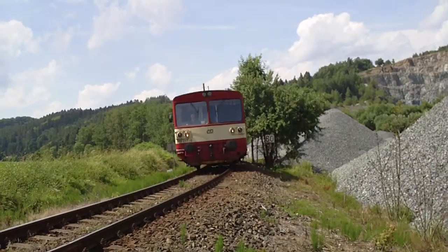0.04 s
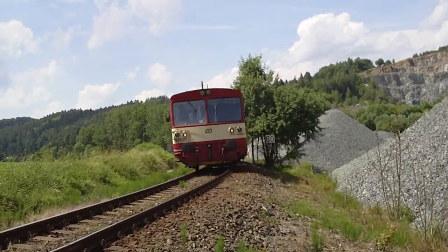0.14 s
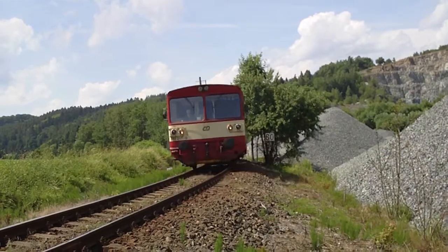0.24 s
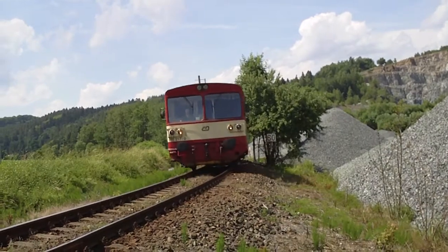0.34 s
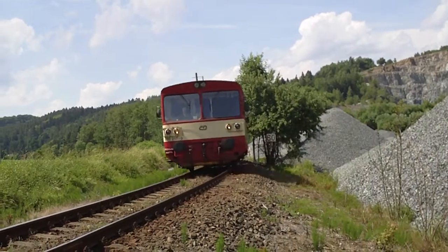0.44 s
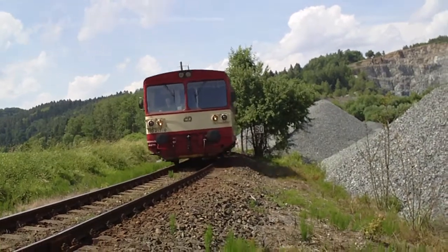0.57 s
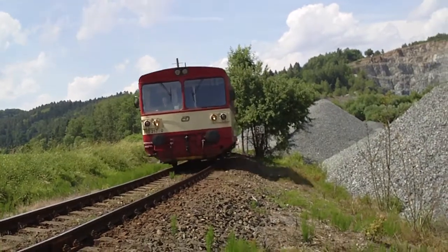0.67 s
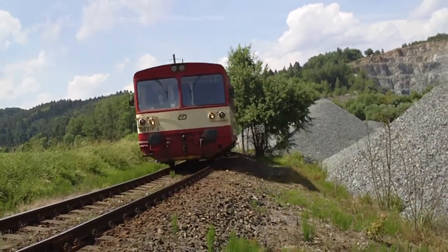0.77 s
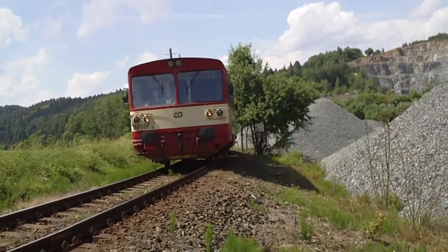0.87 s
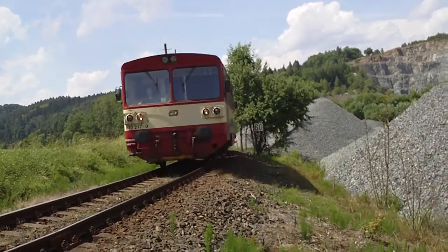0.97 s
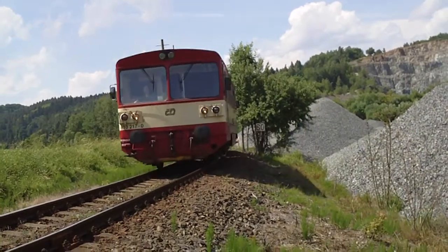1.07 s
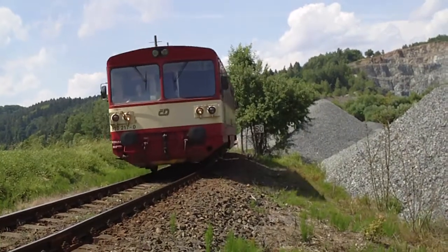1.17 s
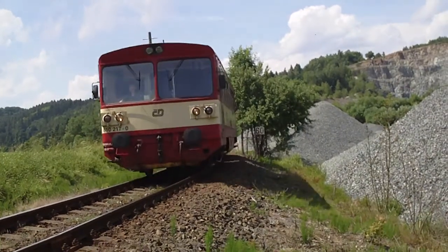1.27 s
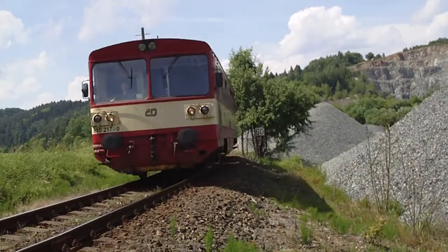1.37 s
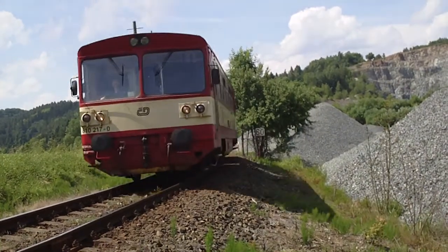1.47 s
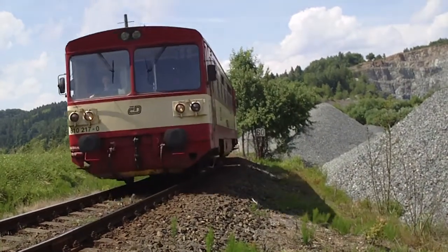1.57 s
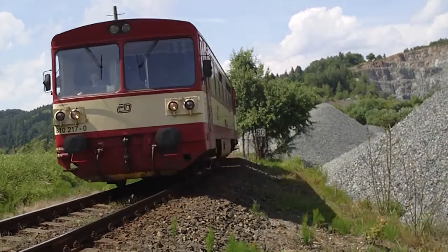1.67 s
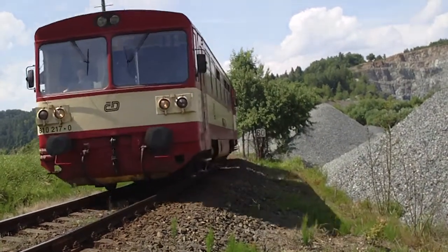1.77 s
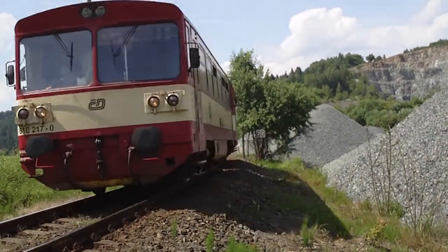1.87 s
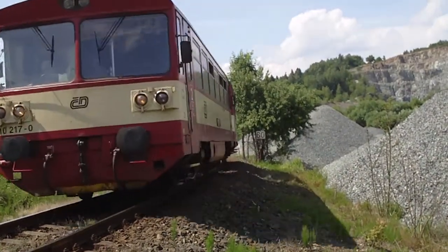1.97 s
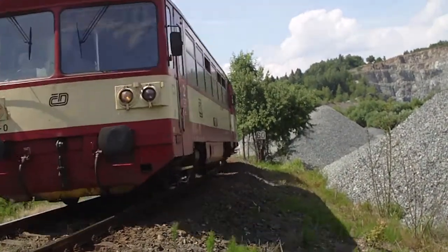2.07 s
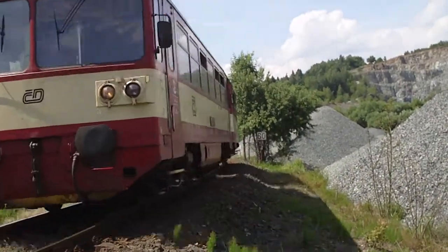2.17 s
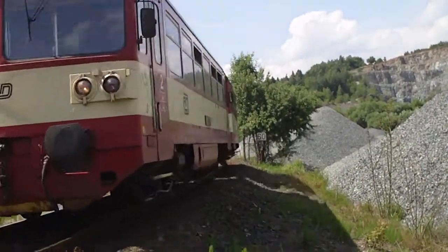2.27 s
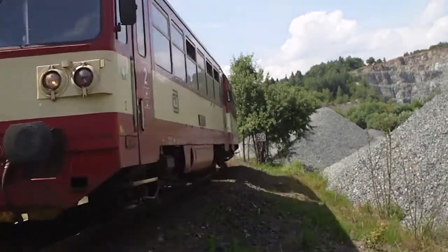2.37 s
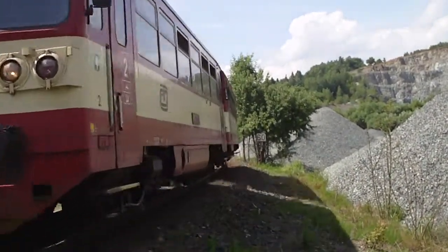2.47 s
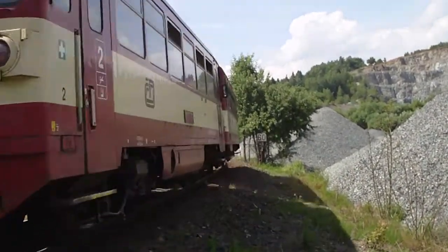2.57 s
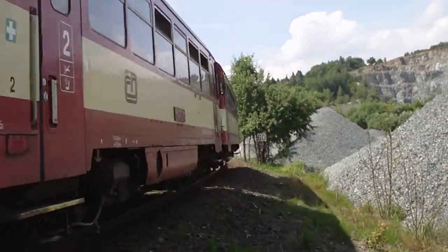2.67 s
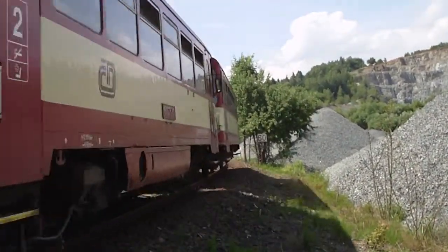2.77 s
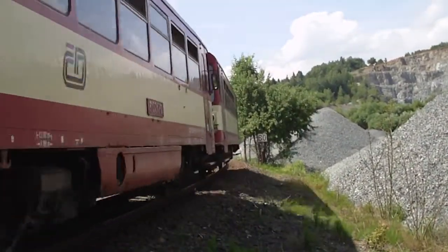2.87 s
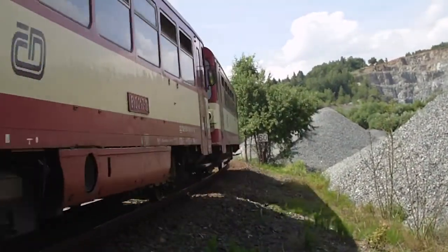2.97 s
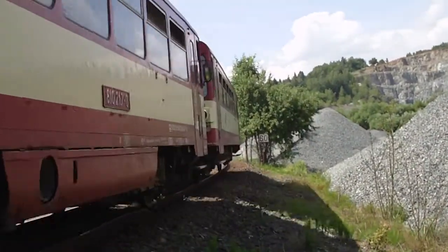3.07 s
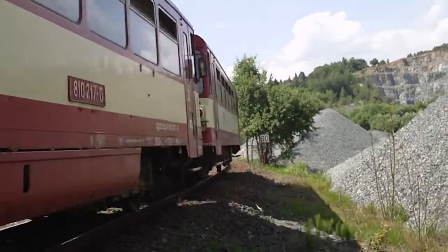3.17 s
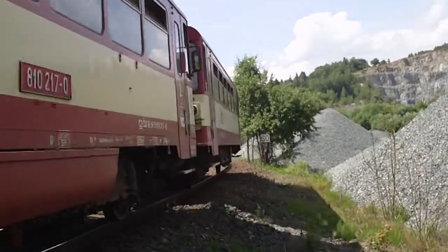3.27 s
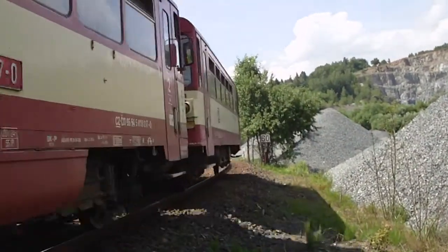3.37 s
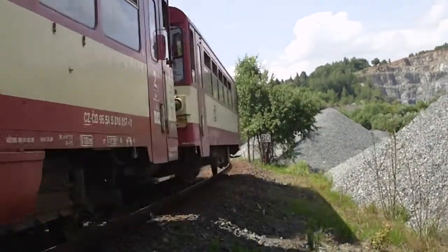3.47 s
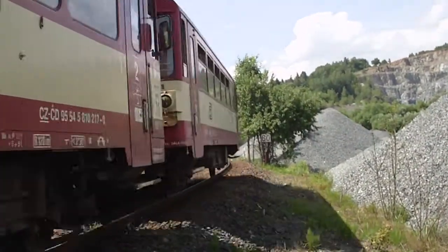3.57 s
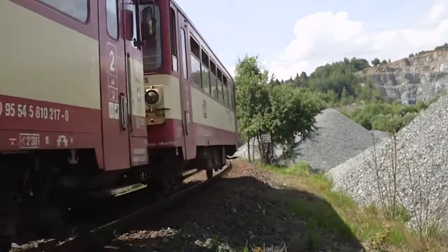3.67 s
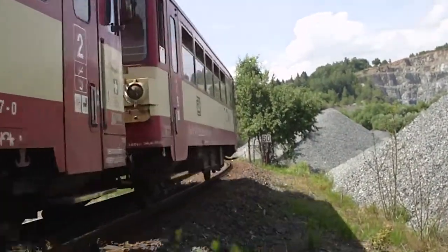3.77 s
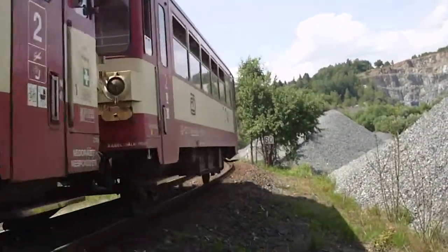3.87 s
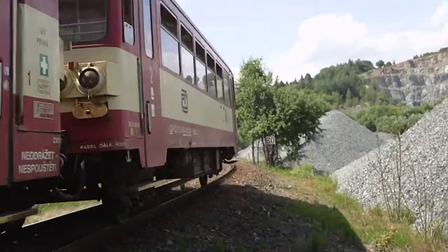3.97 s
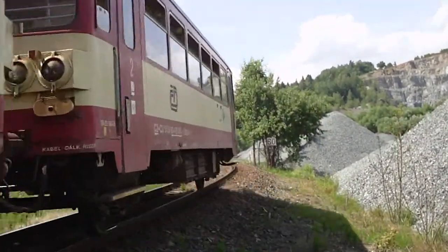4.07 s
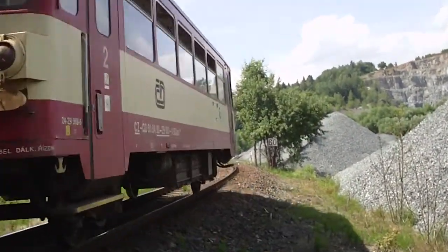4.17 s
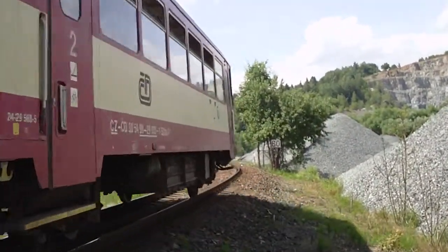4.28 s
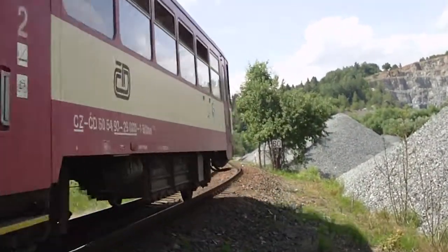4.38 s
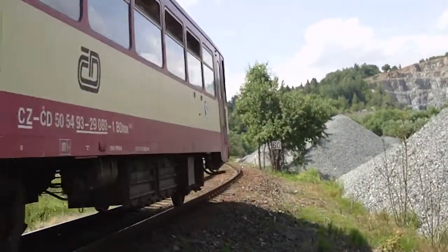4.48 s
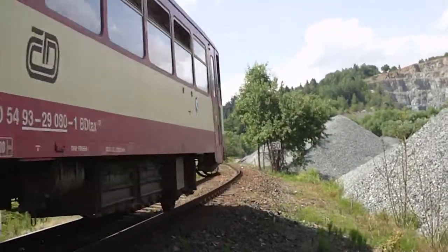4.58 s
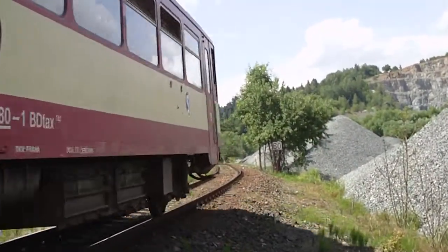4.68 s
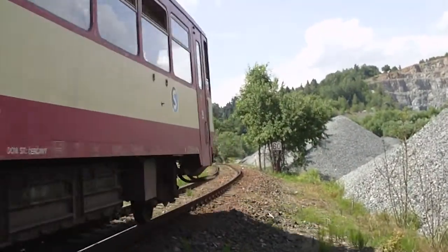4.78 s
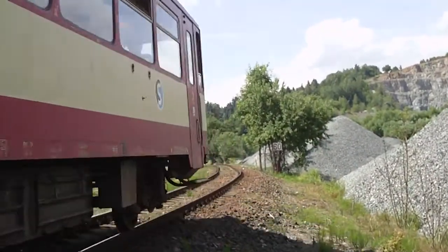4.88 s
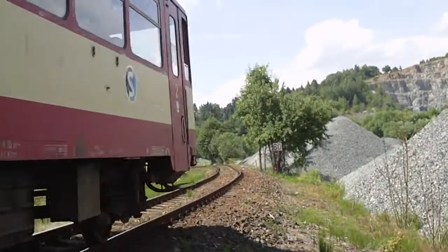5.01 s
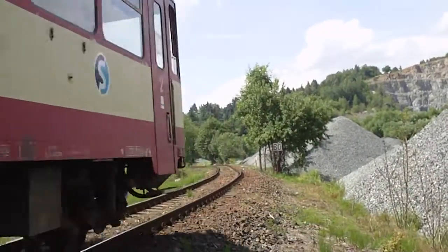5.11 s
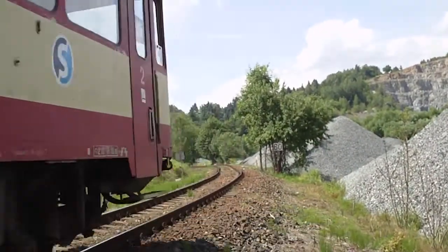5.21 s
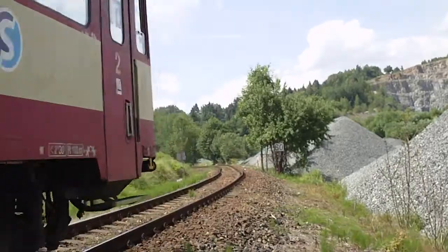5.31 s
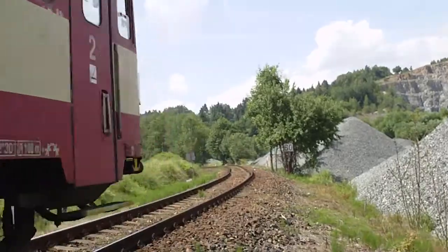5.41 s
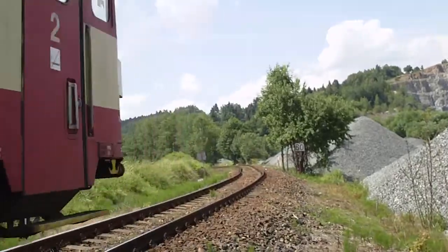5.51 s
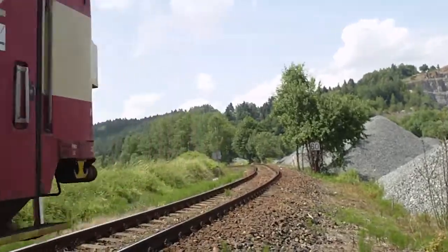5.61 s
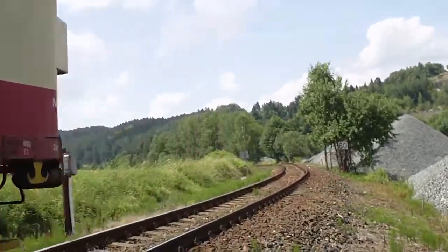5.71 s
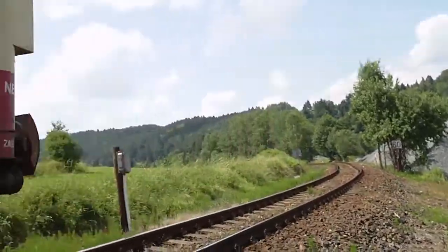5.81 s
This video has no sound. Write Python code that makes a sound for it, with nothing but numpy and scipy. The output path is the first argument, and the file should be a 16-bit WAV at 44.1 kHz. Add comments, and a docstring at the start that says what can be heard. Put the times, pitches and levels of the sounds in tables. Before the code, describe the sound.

Open air beside a railway, close fixed microphone, mono. At first only soft distant rolling noise, a faint squeak and two dry ticks near 0.2 s. At 0.4 s a horn bursts in hard with a hiss of air: two brassy low pitches a semitone apart, beating roughly, cut abruptly at 0.9 s. An echo lingers from slopes while the rolling noise grows from 1 to 2.5 s, with light rattles. The first sharp metallic bang over a rail joint comes at 2.6 s, then others at 3.5, 4.2 and 5.1 s, each a quick double knock with short clatter. Between them is a broad steel roar with hiss, a low engine flutter around 2.8-3.5 s, and ticking fittings. The roar dips briefly near 4.4 s. From 4.7 s thin high squeaks appear; the roar stays strong then eases, with thuds, rattles and a brighter squeal at 5.7 s.

```python
"""A two-car diesel railbus rolls close past, its wheels radiating filtered noise that grows as each axle nears.
Four axles strike one rail joint and excite damped modes; flanges squeak, and fittings rattle and thud.
At the start two air horns beat together, made of pulse trains shaped by their bells under a hiss of air.
Decaying noise convolved with the horns gives their echo from ballast, quarry wall and hills.
A light slipstream and still air, both coloured noise, form the background."""
import sys
import numpy as np
from scipy import signal
from scipy.fft import rfft, irfft, next_fast_len
from scipy.io import wavfile
from scipy.ndimage import uniform_filter1d, map_coordinates

SR = 44100
rng = np.random.default_rng(int(sys.argv[2]) if len(sys.argv) > 2 else 0)


def digitize_waveform(pressure):
    """Quantize a signal to 16-bit integers and store it at the path in sys.argv[1].

    Rows of a 2-D input are taken as channels; values are limited to [-1, 1].
    """
    field = np.atleast_2d(pressure).T
    bounded = np.clip(field, -1, 1)
    quanta = np.round(bounded * 32767).astype(np.int16)
    wavfile.write(sys.argv[1], SR, quanta)


N = 257984

# Axles crossing the joint: (time [s], bang peak before the low cut [dB], clatter level before the low cut [dB],
# rebound delay [s], rebound peak before the low cut [dB], rolling level [dB], flange level [dB])
AXLES = [(2.6382, -6, -15.5, 0.0171, -18, -5.5, -61), (3.5478, -6.5, -18, 0.024, -11, 0.52, -40),
         (4.231, -9, -17.5, .018, -14, 1.4, -33), (5.1489, -5.5, -16, .019, -19, 2, -32)]
VALVE_SHUT_S = 0.8967  # the horns' air is cut


def amp(db):
    """Decibels to amplitude ratio: 20 dB is a factor of ten."""
    return 10 ** (np.asarray(db) / 20)


def unit(x):
    """Normalise the mean power to one."""
    return x / np.sqrt(np.mean(x ** 2) + 1e-20)


def clock():
    """Time axis [s], by uniform sampling."""
    return np.arange(N) / SR


def since(s):
    """Seconds elapsed since s; zero before it, as causality asks."""
    return np.maximum(clock() - s, 0)


def along(points, hz):
    """Interpolate (frequency [Hz], value) points on a logarithmic frequency axis."""
    f, v = np.transpose(points)
    return np.interp(np.log(hz + 1), np.log(f + 1), v)


def wobble(rate):
    """Slow random modulation: a smooth curve through rate random knots per second."""
    knots = rng.standard_normal(int(N * rate / SR) + 4)
    return map_coordinates(knots, [clock() * rate])


def filtered(x, response):
    """Linear filtering: multiply the spectrum by a complex response of frequency."""
    m = next_fast_len(len(x) + 8192)
    hz = np.fft.rfftfreq(m, 1 / SR)
    return irfft(rfft(x, m) * response(hz), m)[:len(x)]


def noise(response, size=N):
    """Coloured noise of rms 1: white noise through a linear filter."""
    return unit(filtered(rng.standard_normal(size), response))


def rush(spectrum, size=N):
    """Broadband noise of rms 1 whose spectrum follows (frequency [Hz], relative level [dB])."""
    return noise(lambda hz: amp(along(spectrum, hz)), size=size)


def steel(spectrum, ripple_db=2.3, spacing_hz=90):
    """Modal density: a crowd of small resonances ripples the spectrum of noise of rms 1."""
    knots = rng.standard_normal(512)

    def response(hz):
        ripple = map_coordinates(knots, [hz / spacing_hz], mode="mirror")
        return amp(along(spectrum, hz) + ripple_db * ripple)
    return noise(response)


def resonance(hz, centre, width):
    """Response of a damped oscillator, 1 at its centre frequency."""
    return 1j * hz * width / (centre ** 2 - hz ** 2 + 1j * hz * width)


def causal(spectrum, size=2048):
    """Minimum-phase impulse response: the folded cepstrum puts the energy as early as possible."""
    cepstrum = irfft(np.log(amp(along(spectrum, np.fft.rfftfreq(size, 1 / SR)))))
    cepstrum[1:size // 2] *= 2
    cepstrum[size // 2 + 1:] = 0
    return irfft(np.exp(rfft(cepstrum)))


def add(track, s, sound):
    """Superposition: mix a sound into the track at s seconds."""
    part = track[max(round(s * SR), 0):][:len(sound)]
    part += sound[:len(part)]


def passing(joint_s, loss_db):
    """Geometric spreading from one axle: gain 1 when abreast, loss_db less per doubling of distance."""
    speed_m_per_s, track_distance_m = 9.02, 4.21
    joint_ahead_m = 4.95  # how far up the line the joint lies
    along_track_m = speed_m_per_s * (clock() - joint_s) - joint_ahead_m
    distance_m = np.hypot(along_track_m, track_distance_m)
    return amp(-loss_db * np.log2(distance_m / track_distance_m))


def engine_near():
    """Directional shielding: a 0-1 weight for the engine's sound from under the floor, 1 when abreast."""
    abreast_s, half_s = 3.173, 0.35
    return 1 / (1 + ((clock() - abreast_s) / half_s) ** 10)


def dips():
    """Gain modulation: the level drops abruptly, holds and swells back; the deepest dip rules."""
    # (time [s], depth [dB], hold [s])
    dip_rows = [(0.414, 26, 0.52), (2.685, 2.5, .08), (4.217, 6, 0.1), (4.393, 14.5, 0.042),
                (5.18, 2.5, 0.11)]
    recovery_db_per_s = 24
    depths = []
    for s, depth_db, hold in dip_rows:
        remaining_db = np.maximum(depth_db - recovery_db_per_s * since(s + hold), 0)
        depths.append((clock() > s) * remaining_db)
    return amp(-np.max(depths, axis=0))


def loudness(wheel_db, loss_db, engine_db):
    """Incoherent summation: four axles and the engine add in power to give one gain."""
    wheel_power = sum((amp(wheel_db + rolling_db) * passing(s, loss_db)) ** 2
                      for s, *_, rolling_db, _ in AXLES)
    return dips() * np.sqrt(wheel_power + amp(engine_db) ** 2 * engine_near())


def rolling(firing_hz=65.5, throb=0.087, lumpy_db=1.0, uneven_db=.4):
    """Roughness excitation: rough steel shakes track and wheels; engine firing modulates the roar."""
    # Spectra of track rumble, roar, wheel ring and tread hiss: (frequency [Hz], relative level per Hz [dB])
    rumble_spectrum = [(25, -47), (70, -24.5), (130, -23.5), (200, -11), (300, -1), (420, 1.5), (520, -7),
                       (800, -62)]
    roar_spectrum = [(300, -39), (430, -10.5), (560, 2.5), (700, 0), (900, -1.5), (1150, -0.5),
                     (1400, -3.5), (1700, -8.5), (2300, -47)]
    ring_spectrum = [(1200, -42), (1700, -4), (2200, 3.5), (2550, -1.5), (2950, 1.5), (3550, -1.5),
                     (4300, -4.5), (5000, -11.5), (6500, -48)]
    hiss_spectrum = [(3800, -29), (5000, 1), (7000, 1), (8600, -0.5), (10500, -3), (11800, -7.5),
                     (13000, -11), (15800, -13)]
    # Their levels: (beside a wheel [dB], loss per doubling of distance [dB], beside the engine [dB])
    rumble_level = (-37, 10.86, -37.5)
    roar_level = (-31, 7.37, -29.5)
    ring_level = (-28.5, 8.14, -37.5)
    hiss_level = (-31.5, 9.236, -36.5)
    shake = amp(.6 * wobble(45) + uneven_db * wobble(13))
    firing_cycles = np.cumsum(firing_hz * (1 + 0.013 * wobble(3.65))) / SR
    firing = 1 + throb * engine_near() * np.cos(2 * np.pi * firing_cycles)
    rumble = loudness(*rumble_level) * amp(lumpy_db * wobble(18)) * rush(rumble_spectrum)
    roar = loudness(*roar_level) * shake * rush(roar_spectrum)
    ring = loudness(*ring_level) * shake * steel(ring_spectrum)
    grit = unit(steel(hiss_spectrum) * amp(1.2 * wobble(500)))  # grit under the treads
    hiss = loudness(*hiss_level) * shake * grit
    return firing * (rumble + roar + ring) + hiss


def joints(landing_s=0.002714, strike_tilt_db=2, landing_tilt_db=-6, clatter_t60=0.28, rise_s=0.0033,
           low_cut_hz=380):
    """Impact excitation: each wheel strikes the rail end, lands, rebounds and sets the gear clattering."""
    # Track modes: (frequency [Hz], level before tilt [dB], t60 [s])
    track_modes = [(530, -17.5, 0.0097), (662, -0.5, 0.022), (808, 7, 0.013), (1130, 2, 0.017),
                   (1460, 1, 0.016), (2060, 6.5, 0.0091), (2816, 3, 0.019)]
    # Clatter spectrum: (frequency [Hz], relative level per Hz [dB])
    clatter_spectrum = [(100, -11), (300, -14), (600, 5), (1100, -1), (1800, -6.5), (2900, -3), (4500, -10),
                        (7000, -10.5), (11000, -14), (15800, -32.5)]
    out, t = np.zeros(N), np.arange(SR // 3) / SR
    for s, peak_db, clatter_db, rebound_s, rebound_db, *_ in AXLES:
        blows = [(0, peak_db, strike_tilt_db),
                 (landing_s, peak_db, landing_tilt_db),
                 (rebound_s, rebound_db, landing_tilt_db)]
        for delay, blow_db, tilt_db in blows:  # tilt in dB per octave
            blow = np.zeros(len(t))
            chance = rng.standard_normal((len(track_modes), 2)) * [1.5, .03]  # level in dB, detuning ratio
            for (hz, db, t60), (more_db, detune) in zip(track_modes, chance):
                decay = amp(db + more_db + tilt_db * np.log2(hz) - 60 * t / t60)
                blow += decay * np.sin(2 * np.pi * hz * (1 + detune) * t)
            blow *= 1 - np.exp(-t / .0003)
            add(out, s + delay, amp(blow_db) * blow / np.abs(blow).max())
        envelope = amp(clatter_db - 60 * t / clatter_t60) * (1 - np.exp(-t / rise_s))
        add(out, s, envelope * rush(clatter_spectrum, size=len(t)))
    low_cut = signal.butter(3, low_cut_hz, "high", fs=SR, output="sos")
    return signal.sosfilt(low_cut, out)


def flanges(loss_db=12, swell_db=2, flutter_db=1.0):
    """Friction-excited modes: rubbing flanges make wheel modes swell and fade, and brief squeaks break out."""
    # Wheel modes: (frequency [Hz], width [Hz], relative level [dB])
    wheel_modes = [(2110, 82, -17), (2830, 47, 4), (3463, 42, 5), (3850, 70, -9), (4050, 36, -3),
                   (4790, 63, 0), (6510, 260, -3.5), (9170, 71, -9)]
    # Squeaks: (start [s], end [s], frequency [Hz], width [Hz], level [dB])
    squeaks = [(-.3, 0.36, 1456, 140, -45.5), (0.14, 0.195, 1160, 160, -42.5),
               (2.813, 2.918, 11000, 900, -37.5), (3.34, 3.37, 11000, 300, -34),
               (3.415, 3.48, 9700, 400, -37.5), (4.237, 4.407, 3490, 90, -42),
               (4.85, 5.16, 15300, 900, -42), (4.786, 5.004, 2880, 50, -35), (4.722, 5.1, 3480, 60, -37.5),
               (4.917, 5.12, 4840, 90, -33.5), (5.483, 5.63, 2780, 69, -34), (5.717, 5.92, 3410, 35, -25),
               (5.718, 5.78, 6740, 600, -24.5), (5.74, 5.9, 3700, 50, -36)]

    def tone(centre, width):
        return noise(lambda hz: resonance(hz, centre, width) ** 2)

    rubbing_power = sum((amp(flange_db) * passing(s, loss_db)) ** 2 for s, *_, flange_db in AXLES)
    modes = sum(amp(db + swell_db * wobble(7)) * tone(centre, width) for centre, width, db in wheel_modes)
    out = dips() * np.sqrt(rubbing_power) * unit(modes)
    for start, end, centre, width, db in squeaks:
        swell = np.sin(np.pi * np.clip((clock() - start) / (end - start), 0, 1))
        out += amp(db + flutter_db * wobble(40)) * swell * tone(centre, width)
    return out


def contacts(rows, octaves, rise):
    """Damped impacts: each contact is a broad noise band that dies away; rise is a share of its t60."""
    out, t = np.zeros(N), np.arange(SR // 3) / SR
    for s, db, centre, t60 in rows:
        def response(hz):
            return 1 / (1 + (np.log2((hz + 1) / centre) / octaves) ** 6) ** .5
        envelope = amp(db - 60 * t / t60) * (1 - np.exp(-t / (rise * t60)))
        add(out, s, envelope * noise(response, size=len(t)))
    return out


def rattles():
    """Damped impacts of loose fittings, heard as ticks and rattles."""
    # (time [s], level [dB], centre frequency [Hz], t60 [s])
    rattle_rows = [(0, -40, 4100, 0.47), (.199, -17.5, 4140, 0.0079), (0.223, -15.5, 3320, 0.0064),
                   (1.403, -49, 7000, 0.24), (1.406, -43, 1500, 0.27), (1.492, -44.5, 3880, 0.19),
                   (2.05, -33.5, 5450, 0.26), (2.313, -27.5, 4480, 0.14), (2.727, -26, 7260, 0.17),
                   (2.96, -25, 5000, 0.25), (3.02, -26, 6000, .06), (3.531, -22.5, 7500, 0.076),
                   (3.604, -19.5, 5500, 0.056), (3.675, -19.5, 3360, 0.24), (3.727, -18.5, 6840, 0.17),
                   (4.115, -25, 7500, .05), (5.326, -24, 6000, 0.042), (5.41, -24, 2580, 0.29),
                   (5.508, -20, 7000, 0.15), (5.625, -20.5, 6460, 0.14), (5.711, -13.5, 5500, 0.03),
                   (5.739, -17, 8000, 0.028)]
    return contacts(rattle_rows, octaves=0.85, rise=0.035)


def thuds():
    """Damped impacts of lower pitch: soft thuds of the swaying cars."""
    # (time [s], level [dB], centre frequency [Hz], t60 [s])
    thud_rows = [(3.935, -41, 149, .22), (4.33, -37, 180, 0.13), (4.387, -24, 520, 0.037),
                 (4.568, -42, 181, 0.22), (4.975, -37, 171, .14), (5.48, -22.5, 343, 0.12),
                 (5.735, -33, 260, 0.15)]
    return contacts(thud_rows, octaves=0.47, rise=0.025)


def horn_controls(start, hz, held_db, rise, overshoot_db, settle, sharp_hz, flat_hz):
    """Exponential relaxation: a horn bursts in loud, its pitch offsets fade, and it lifts as air is cut."""
    sharp_s, flat_s = .0088, .133  # how fast the sharp start and the flatness after it fade
    release_db_per_s, release_rise_hz_per_s = 850, 400
    sag_db_per_s = 2  # the pressure sags
    brighten_s, brightness = 0.01, 0.95  # the puffs sharpen as the rise ends, to this held share (0-1)
    age, closing = since(start + rise), since(VALVE_SHUT_S)
    pitch = hz + sharp_hz * np.exp(-age / sharp_s) - flat_hz * np.exp(-age / flat_s)
    pitch = pitch + release_rise_hz_per_s * closing
    attack_db = overshoot_db * np.exp(-age / settle) - 40 * np.maximum(1 - since(start) / rise, 0)
    db = held_db + attack_db - sag_db_per_s * age - release_db_per_s * closing
    opening = np.clip((clock() - start - rise) / brighten_s + .5, 0, 1)
    bright = brightness * opening * np.exp(-closing / .04)
    blowing = (clock() > start) & (closing < .05)
    return blowing * pitch, db, bright


def reed(row, bell, waver, jitter_s, scatter_db, dull_hz=1100):
    """Source-filter principle: a diaphragm lets one puff per cycle into the bell, sharper as pressure builds."""
    pitch, db, bright = horn_controls(*row)
    cycles = np.cumsum(pitch * (1 + waver * wobble(90.0))) / SR
    at = np.interp(np.arange(1, int(cycles[-1])), cycles, np.arange(N))
    chance = rng.standard_normal((len(at), 2))
    at = at + jitter_s * SR * chance[:, 0]
    # windowed-sinc pulses place each puff between samples
    taps = at.astype(int)[:, None] + np.arange(-7, 9)
    offset = taps - at[:, None]
    puffs = np.sinc(offset) * np.cos(np.pi * offset / 16) ** 2
    puffs = puffs * amp(scatter_db * chance[:, 1:])
    pulse_train = np.bincount(taps.ravel(), puffs.ravel(), N)
    sharp = signal.fftconvolve(pulse_train, causal(bell))[:N]
    sharp /= sharp[pitch > 0].std()
    dull = signal.sosfilt(signal.butter(2, dull_hz, fs=SR, output="sos"), sharp)
    bright = np.clip(bright, 0, 1)
    return amp(db) * (bright * sharp + 1.6 * (1 - bright) * dull)


def horn(valve_s=.401, valve_db=-30.5, valve_width_s=0.0081, vent_db=-52, vent_t60=.6):
    """Beating: a valve hisses open, two horns about a semitone apart sound, and escaping air trails off."""
    # Each horn: (start [s], pitch [Hz], held level [dB], rise [s], overshoot [dB], settling [s],
    # start sharp [Hz], start flat [Hz])
    high_horn = (.398, 263.1, -21.9, .0132, 18, .012, 13, 5.9)
    low_horn = (.4135, 246.9, -28.3, .022, 7.5, .04, 0, 0)
    # Flared bells: (frequency [Hz], relative level [dB])
    high_bell = [(100, -26), (260, -22.5), (520, -10.5), (780, -3.5), (1040, 1.5), (1300, 0.5),
                 (1580, -8.5), (2090, -3), (2400, -10), (2900, -0.5), (3600, -6), (4900, -13.5),
                 (5500, -9.5), (6100, -22), (6700, -8), (8200, -32), (11000, -27), (15800, -29)]
    low_bell = [(100, -38), (490, -15), (740, -5), (990, 1), (1240, -7.5), (1730, -3.5), (2220, -5.5),
                (2720, -2), (3450, -5), (4300, -8), (6600, -17), (8200, -14.5), (11000, -16), (15800, -23)]
    # (frequency [Hz], relative level [dB])
    air_spectrum = [(25, -11), (120, -12.5), (400, -10.5), (1000, -8), (3000, 2.5), (5000, -1.0),
                    (12000, -3.0), (15800, -12)]
    valve_spectrum = [(200, -18), (1000, -10), (3500, 7), (6500, -10), (12000, -28)]
    tone = reed(high_horn, high_bell, waver=0.0016, jitter_s=.00001, scatter_db=-0.1)
    tone = tone + reed(low_horn, low_bell, waver=0.0013, jitter_s=.000007, scatter_db=0.0)
    tone = filtered(tone, lambda hz: 1 - 2 * resonance(hz, 3060, 1950))  # the bell spreads each puff in time
    pressure = np.sqrt(np.abs(uniform_filter1d(tone ** 2, size=90)))
    vent = (clock() > VALVE_SHUT_S) * amp(vent_db - 60 * since(VALVE_SHUT_S) / vent_t60)
    air = (amp(-11.0) * pressure + vent) * rush(air_spectrum)
    valve = amp(valve_db) * np.exp(-((clock() - valve_s) / valve_width_s) ** 2)
    return tone + air + valve * rush(valve_spectrum)


def hills(x, quarry_s=.47, quarry_db=-33):
    """Reverberation by convolution: ballast scatters at once, a quarry wall answers late over the hills' wash."""
    # Echo decay: (frequency [Hz], t60 [s])
    echo_decay = [(200, 0.85), (1000, 6.6), (3000, 1.8), (8000, .5), (15000, 0.27)]
    # Colour of the far echo: (frequency [Hz], gain [dB])
    far_colour = [(200, -3), (1000, -3), (1700, -3.0), (3000, -9), (10000, -21)]
    hz, t, z = signal.stft(rng.standard_normal(2 * SR), SR, nperseg=256)
    decay = amp(-60 * t / along(echo_decay, hz)[:, None])
    far = signal.istft(z * decay, SR, nperseg=256)[1]
    far *= amp(-33) / np.linalg.norm(far)
    add(far, quarry_s, [amp(quarry_db)])
    far = filtered(far, lambda f: amp(along(far_colour, f)))
    near = rng.standard_normal(len(far)) * amp(-60 * np.arange(len(far)) / SR / 0.15)
    near = amp(-14) * near / np.linalg.norm(near)
    return signal.fftconvolve(x, far + near)[:N]


def slipstream(peak_s=4.6, width_s=.8, db=-62, gusty_db=4.0):
    """Turbulent pressure: air dragged along by the cars buffets the microphone lightly."""
    swell = np.exp(-((clock() - peak_s) / width_s) ** 2)
    buffeting = rush([(25, -3), (70, -3), (150, 4), (300, -20), (800, -70)])
    return amp(db + gusty_db * wobble(10)) * swell * buffeting


def still_air():
    """Stationary background noise of constant level and fixed spectrum."""
    # (frequency [Hz], relative level per Hz [dB])
    air_floor = [(25, 0), (60, -9.5), (150, -12.5), (400, -30), (1000, -11), (3000, -13), (7000, -21),
                 (15800, -59)]
    return amp(-63.5) * rush(air_floor)


def scene():
    """Superposition of the passing train, the horn with its echo, and the air, all in mono."""
    train = rolling() + joints() + flanges() + rattles() + thuds()
    blast = horn()
    mono = train + blast + hills(blast) + slipstream() + still_air()
    return np.array([mono, mono])


def record(dry, notch_depth=1.0):
    """Soft saturation rounds off the highest peaks; two narrow stop bands and a band limit follow."""
    # Stop bands: (frequency [Hz], width [Hz])
    stop_bands = [(3960, 224), (7920, 280)]
    top_hz = 15850
    rounded = dry / (1 + np.abs(dry / .72) ** 6) ** (1 / 6)

    def response(hz):
        notches = [1 - min(notch_depth, 1) * resonance(hz, centre, width) for centre, width in stop_bands]
        return np.prod(notches, axis=0) * (hz < top_hz)
    return np.array([filtered(side, response) for side in rounded])


dry = scene()
out = record(dry)
digitize_waveform(out)
```